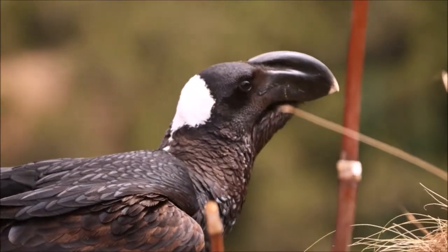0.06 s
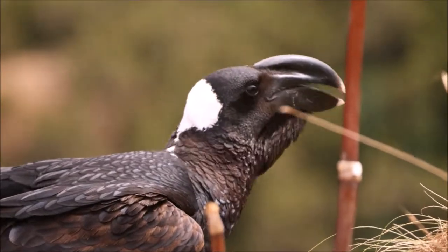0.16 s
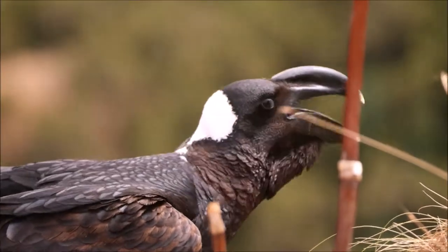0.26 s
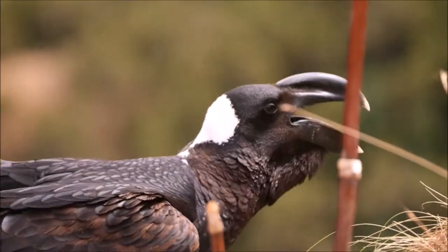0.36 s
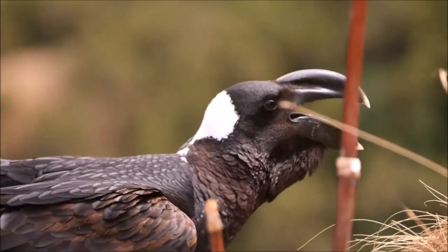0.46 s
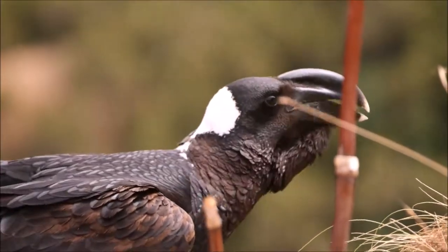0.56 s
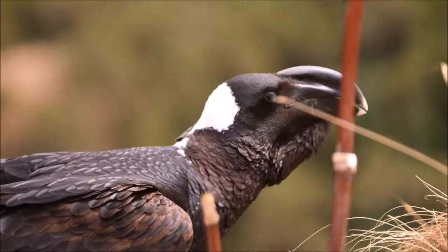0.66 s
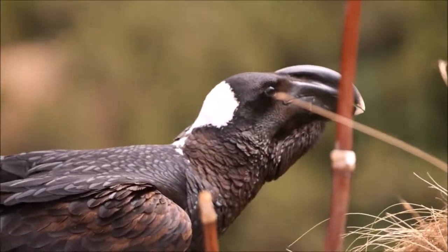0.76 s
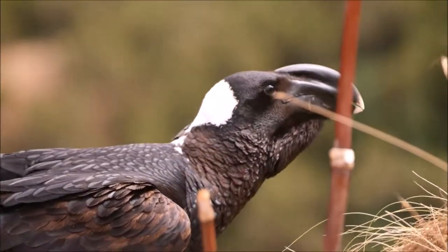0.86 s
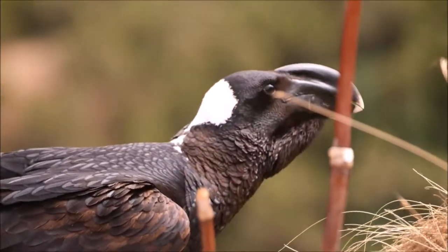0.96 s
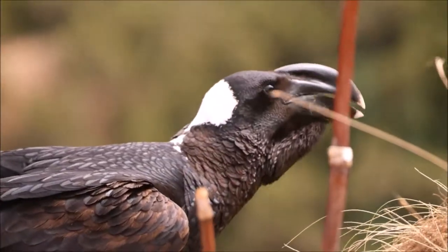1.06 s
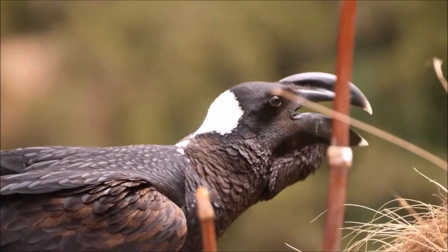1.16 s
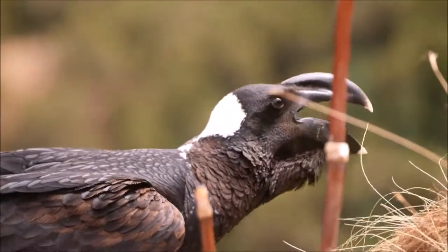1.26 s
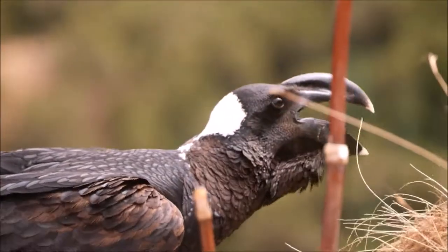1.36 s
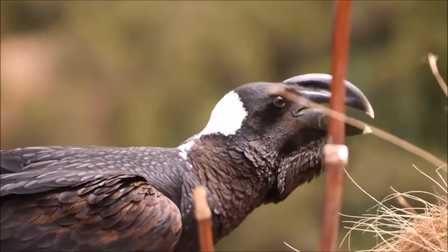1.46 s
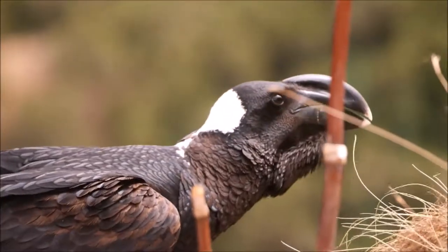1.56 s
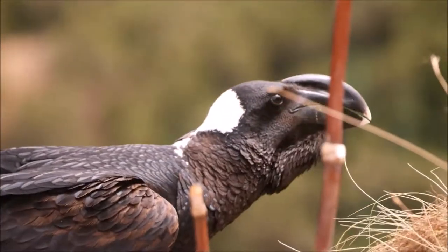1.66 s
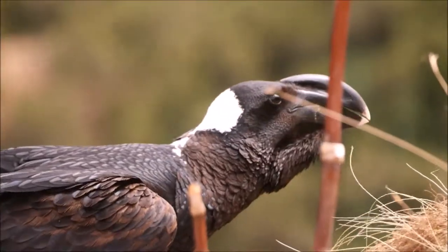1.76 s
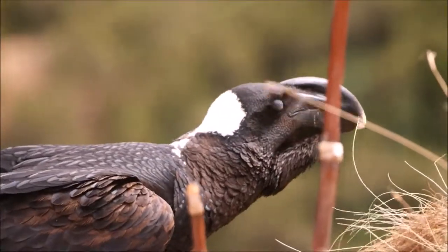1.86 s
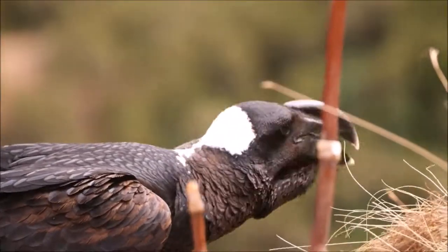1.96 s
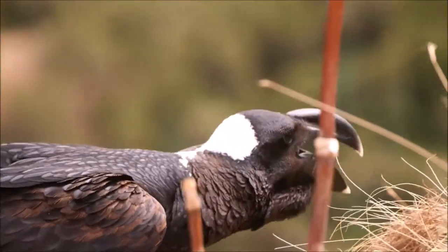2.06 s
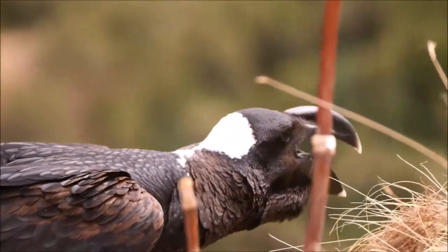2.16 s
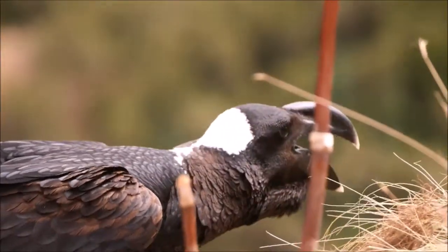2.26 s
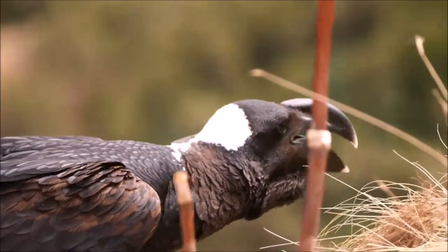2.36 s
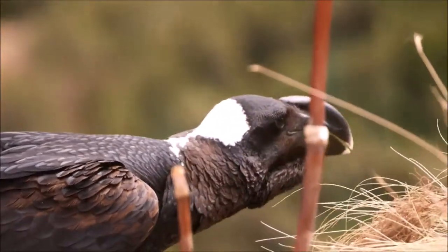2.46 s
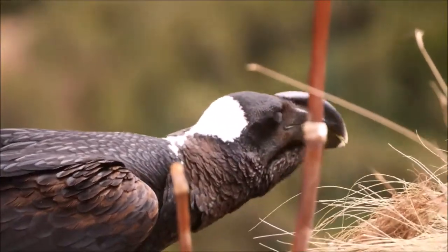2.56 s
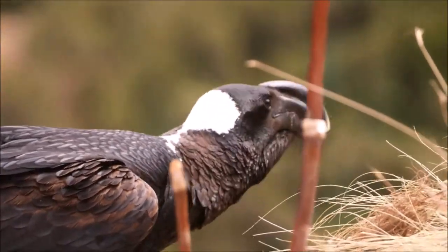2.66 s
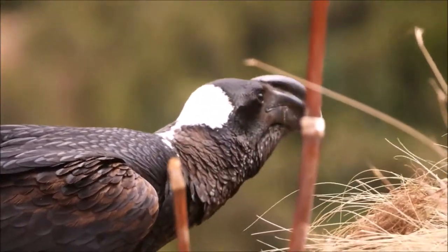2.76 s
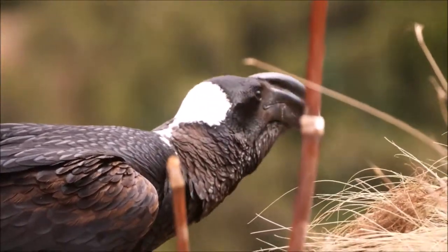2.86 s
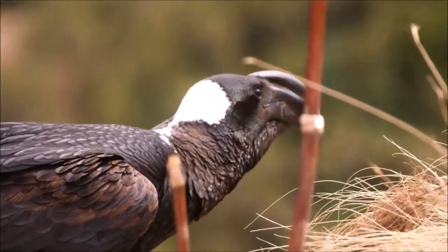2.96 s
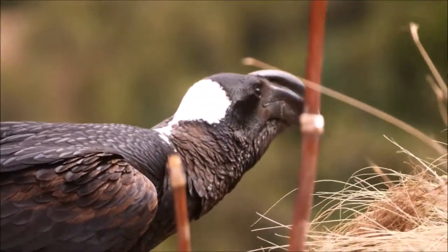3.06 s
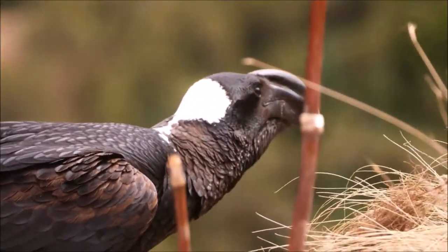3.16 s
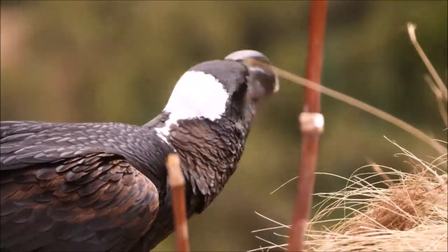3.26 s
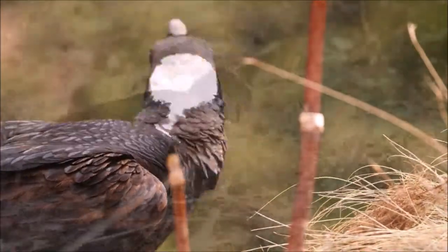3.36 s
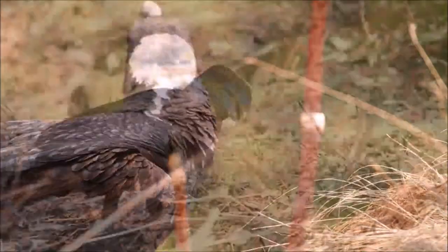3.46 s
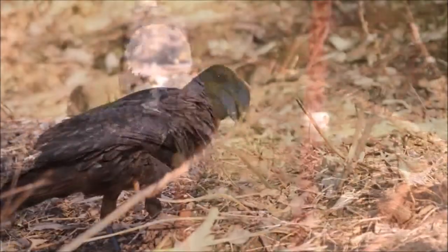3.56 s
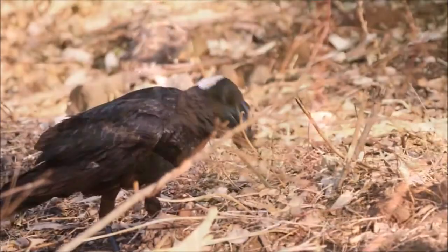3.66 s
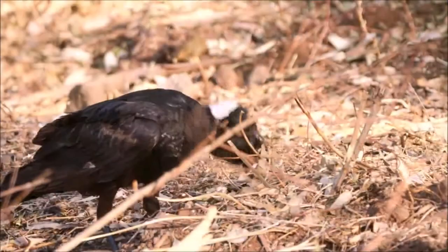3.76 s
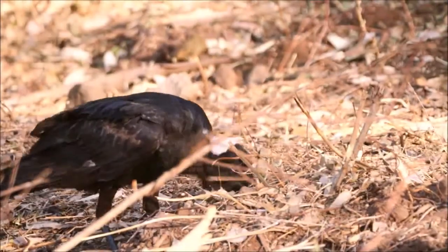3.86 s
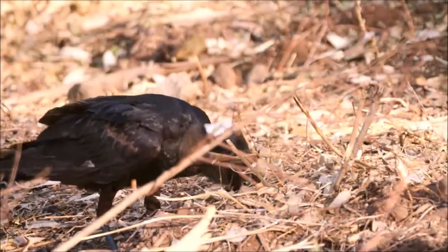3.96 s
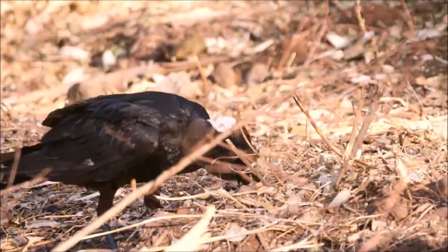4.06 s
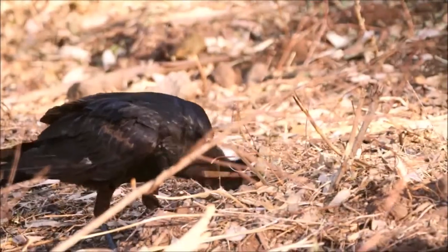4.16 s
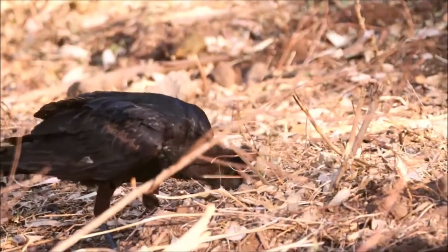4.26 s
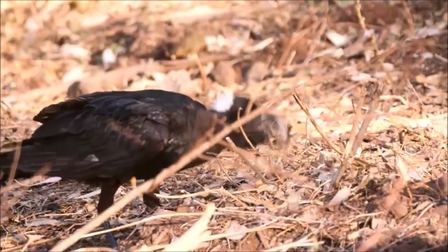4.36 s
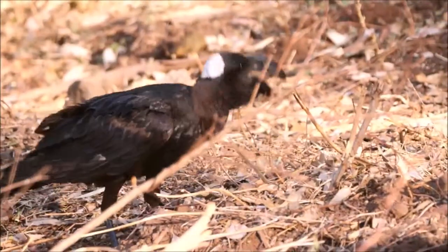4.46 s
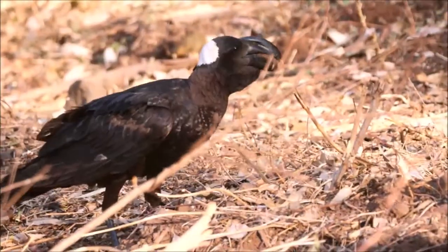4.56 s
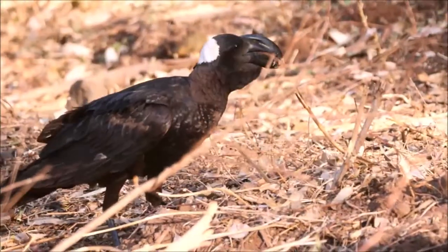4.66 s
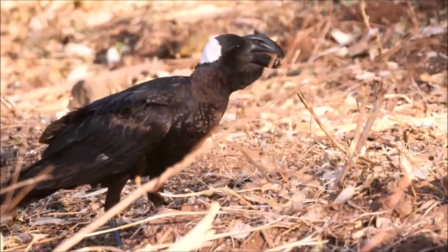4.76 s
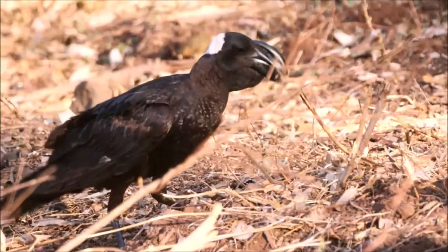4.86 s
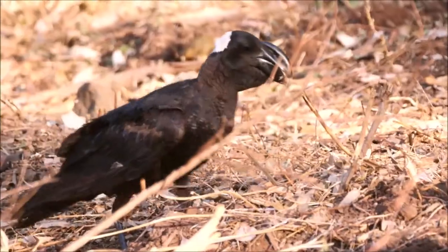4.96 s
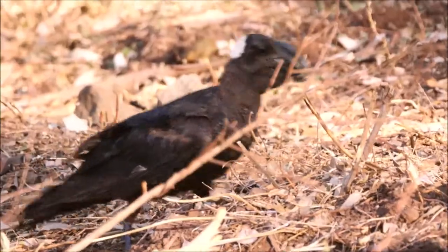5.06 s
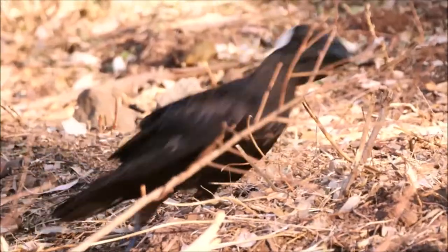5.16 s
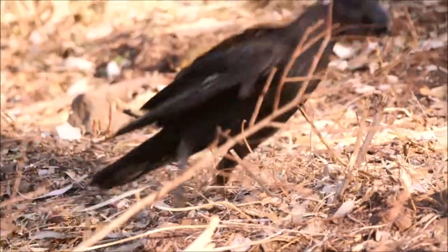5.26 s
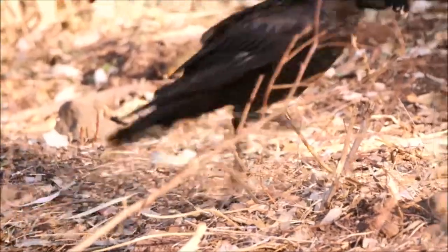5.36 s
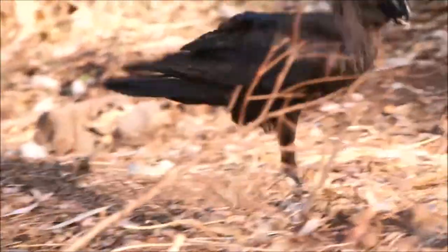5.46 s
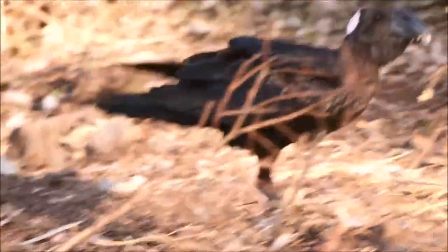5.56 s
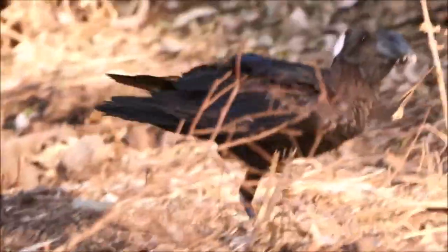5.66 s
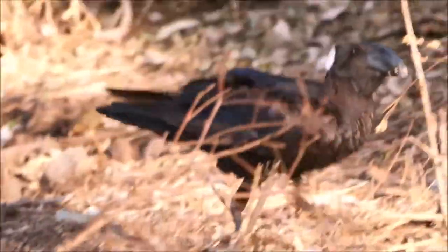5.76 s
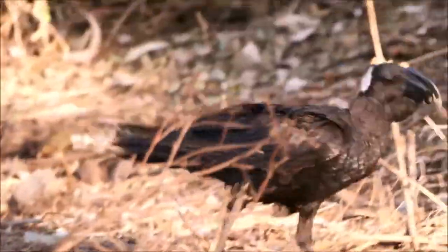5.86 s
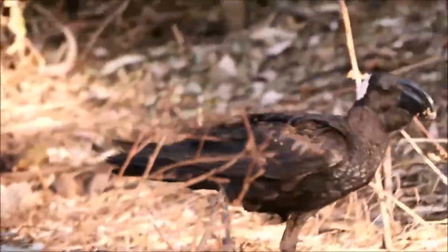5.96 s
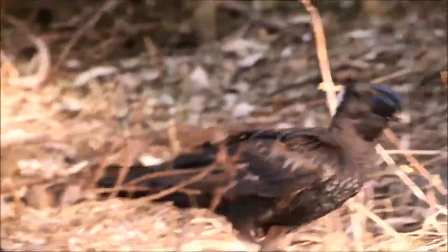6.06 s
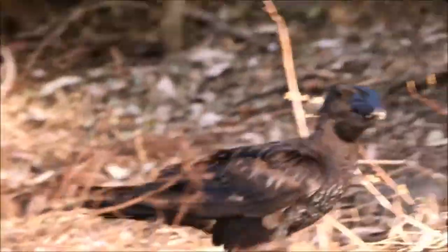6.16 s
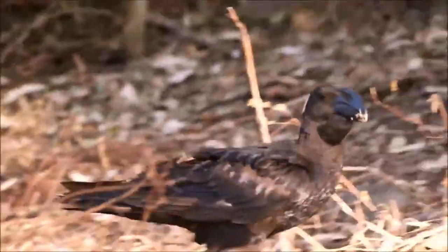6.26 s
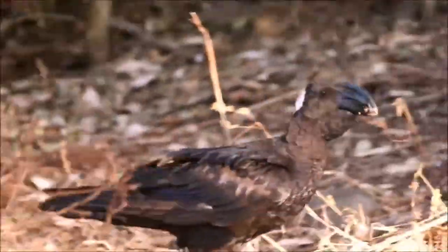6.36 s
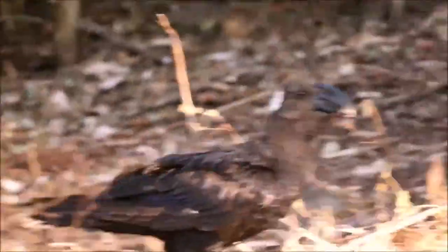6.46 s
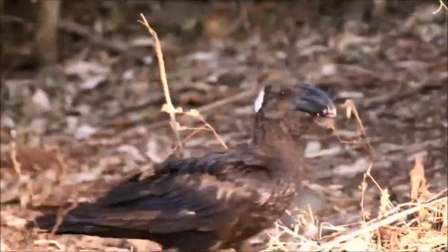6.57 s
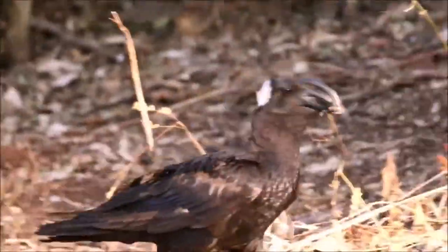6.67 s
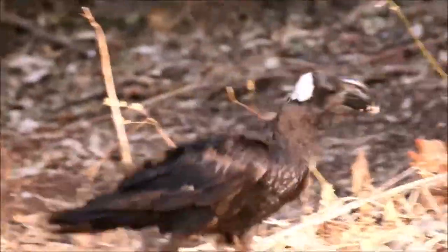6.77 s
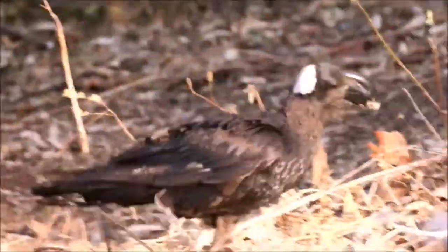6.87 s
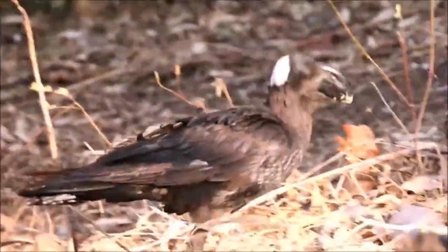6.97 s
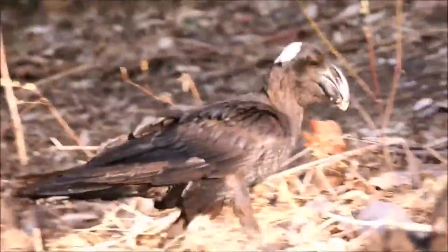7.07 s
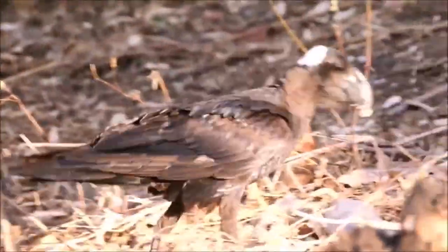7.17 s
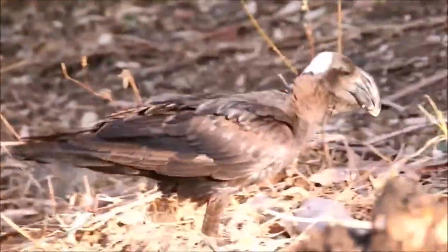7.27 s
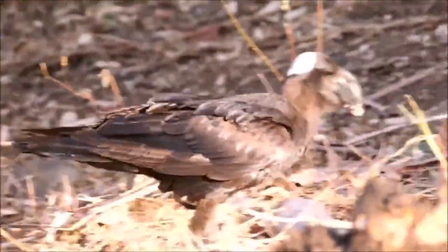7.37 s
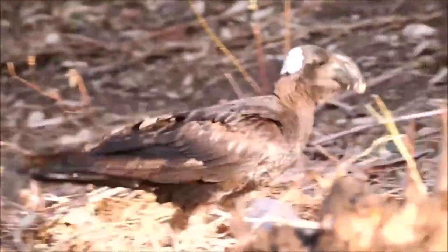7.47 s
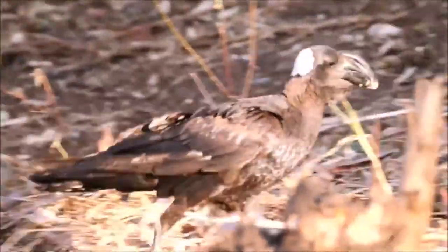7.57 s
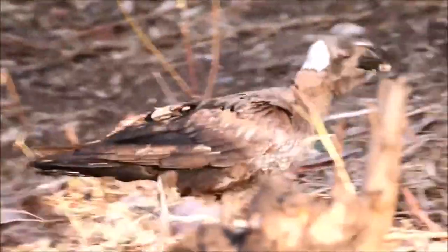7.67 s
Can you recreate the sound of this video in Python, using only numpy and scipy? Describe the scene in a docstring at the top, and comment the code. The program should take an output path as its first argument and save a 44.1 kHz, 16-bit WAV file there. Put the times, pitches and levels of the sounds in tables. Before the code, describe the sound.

Three close, throaty raven caws, each a shrill whistle chopped into a fast rough rattle with breath, come over gusty low wind buffeting. After the last caw there is a calm, then the background changes to a broader outdoor murmur. A distant raven gives a short pulsing croak and a few falling yelps; small birds add thin descending whistles and buzzy chirps, with crisp dry-litter ticks and a brief rustle.

```python
"""A large raven close by gives three rasping caws: whistles chopped by a slow throat cycle, knocks and breath.
Wind buffets the microphone with rumbling noise and short swings of pressure. The air of this first place,
shaped noise, fades out. A second place fades in: a broad outdoor murmur and hiss, a farther raven that croaks
in throat pulses and yelps in falling partials, small birds made of gliding tones in echoes, and dry stalks
that tick in short noise bursts."""
import sys
import numpy as np
from scipy import signal
from scipy.fft import rfft, irfft, next_fast_len
from scipy.io import wavfile
from scipy.ndimage import uniform_filter1d, map_coordinates

SR = 44100
rng = np.random.default_rng(int(sys.argv[2]) if len(sys.argv) > 2 else 0)


def waveform_to_disk(signal):
    """Save audio, clipped to [-1, 1], as 16-bit WAV at the path in sys.argv[1]."""
    frames = np.transpose(np.atleast_2d(signal))
    scaled = np.clip(frames, -1, 1) * 32767
    samples = np.round(scaled).astype(np.int16)
    wavfile.write(sys.argv[1], SR, samples)


N = 340893


def amp(db):
    """Turn decibels into a plain multiplier."""
    return 10 ** (np.asarray(db) / 20)


def unit(x):
    """Scale a sound to an rms of 1."""
    return x / np.sqrt(np.mean(x ** 2) + 1e-20)


def along(points, hz):
    """Read a curve of (Hz, value) points, with pitch on a log axis."""
    f, v = np.transpose(points)
    return np.interp(np.log(hz + 1), np.log(f + 1), v)


def span(rows):
    """Sample numbers from the first row to the last, and each column filled in between its rows."""
    times, *columns = np.transpose(rows)
    i = np.arange(round(times[0] * SR), min(round(times[-1] * SR), N))
    return i, [np.interp(i / SR, times, column) for column in columns]


def wobble(rate, size=N):
    """A smooth random curve with this many random points a second."""
    points = rng.standard_normal(int(size * rate / SR) + 4)
    return map_coordinates(points, [np.arange(size) * rate / SR])


def filtered(x, response):
    """Change the strength and timing of each frequency in x by a response curve."""
    m = next_fast_len(x.shape[-1] + 8192)
    spectrum = rfft(x, m) * response(np.fft.rfftfreq(m, 1 / SR))
    return irfft(spectrum, m)[..., :x.shape[-1]]


def tract(modes):
    """The response of a hollow tube: resonances (Hz, width Hz, dB) added with alternating sign."""
    def response(f):
        return sum((-1) ** k * amp(db) * 1j * f * width / (centre ** 2 - f * f + 1j * f * width)
                   for k, (centre, width, db) in enumerate(modes))
    return response


def pulses(rate, scatter_db):
    """One click of slightly random size per cycle, and the running cycle count."""
    count = np.cumsum(rate) / SR
    sizes = amp(scatter_db * rng.standard_normal(200))
    return np.diff(np.floor(count), prepend=0) * sizes[count.astype(int)], count


def rush(spectrum, alike, patchy_db):
    """Stereo noise of rms 1, made uneven by smooth random patches in time and pitch."""
    z = signal.stft(rng.standard_normal((2, N)), nperseg=512)[2]
    field = uniform_filter1d(rng.standard_normal(z.shape[1:]), size=6, axis=0)
    field = uniform_filter1d(field, size=12, axis=1)
    pair = signal.istft(z * amp(patchy_db * unit(field)), nperseg=512)[1][:, :N]

    def mix(hz):
        # this angle splits the noise into a shared part and a left-right difference
        angle = np.arccos(np.clip(along(alike, hz), -1, 1)) / 2
        return amp(along(spectrum, hz)) * [np.cos(angle), np.sin(angle)]

    mid, side = filtered(pair, mix)
    return unit(np.array([mid + side, mid - side]))


def echoes(x, t60, alike, colour):
    """A smeared tail from ground, trees and slopes that dies by 60 dB in t60 s, partly shared by both sides."""
    t = np.arange(SR // 2) / SR
    tail = rng.standard_normal((2, len(t))) * amp(-60 * t / t60) * (t > .004)
    tail = tail + alike * tail[::-1]
    tail = filtered(tail / np.linalg.norm(tail[0]), lambda hz: amp(along(colour, hz)))
    return signal.fftconvolve(x[None], tail, axes=1)[:, :N]


def swell(s, rise_s, fall_s):
    """A rise and fall in strength that peaks at 1 at time s."""
    t = np.arange(N) / SR - s
    return np.exp(np.minimum(t / rise_s, -t / fall_s))


# tone of the first place's air: pitch_hz, relative level_db per Hz
HILL_TONE = [(25, -43.5), (60, -17), (110, 2), (250, -7.5), (550, -11.5), (980, -11), (1150, -16),
             (1600, -20), (1820, -15.5), (2050, -23), (3200, -16.5), (3900, -26.5), (8300, -24.5),
             (9100, -39), (10500, -29), (15600, -22.5)]
# tone of the second place's murmur: pitch_hz, relative level_db per Hz
MURMUR_TONE = [(25, -32), (45, -27), (96, -3.5), (190, -0.5), (450, -5.5), (900, -8.5), (1250, -16.5),
               (1500, -16.5), (1680, -15.5), (2100, -22.5), (2600, -25), (3100, -20.5), (3500, -25),
               (4000, -37), (6000, -52)]
# tone of the second place's hiss: pitch_hz, relative level_db per Hz
HISS_TONE = [(2500, -20), (4000, -4), (6000, -5), (8300, -5), (8650, -22), (9050, -57), (9700, -8),
             (10400, -13.5), (12000, -6.5), (15600, -4)]
# how alike left and right are in the air, and in the rustle below: pitch_hz, likeness (-1 to 1)
SIDE_LIKENESS = [(60, 0.99), (180, 1.0), (550, 0.95), (1650, 0.57), (4970, 0.36), (15000, -0.21)]
HILL_DB, FADE_OUT_S, FADE_OUT_POWER = -54.5, 3.856, 0.99
CUT_S = 3.672  # the second place takes over
MURMUR_DB, HISS_DB, FADE_IN_FROM_S, FADE_IN_TO_S = -48, -63, 3.456, 5.55  # levels once faded in


def air():
    """Steady background noise: the first place fades out, the second cuts in and fades up."""
    t = np.arange(N) / SR
    leaving = np.clip(1 - t / FADE_OUT_S, 0, 1) ** FADE_OUT_POWER * (t < CUT_S)
    coming = np.clip((t - FADE_IN_FROM_S) / (FADE_IN_TO_S - FADE_IN_FROM_S), 0, 1) * (t >= CUT_S)
    hill = amp(HILL_DB) * rush(HILL_TONE, SIDE_LIKENESS, patchy_db=2.0)
    murmur = amp(MURMUR_DB + 1.24 * wobble(4.9)) * rush(MURMUR_TONE, SIDE_LIKENESS, patchy_db=1.5)
    hiss = amp(HISS_DB) * rush(HISS_TONE, SIDE_LIKENESS, patchy_db=1.6)
    return leaving * hill + coming * (murmur + hiss)


# strength of the wind's rumble before the low cut: time_s, level_db
WIND_STRENGTH = [(0, -64), (.17, -42.5), (.3, -33), (.39, -37.5), (.53, -31.5), (.64, -43.5), (.72, -36.5),
                 (.79, -28), (.83, -39.5), (1.02, -41.5), (1.18, -47.5), (1.28, -41.5), (1.36, -46.5),
                 (1.65, -48), (1.72, -66), (2.05, -70), (2.15, -53.5), (2.55, -53.5), (2.6, -73),
                 (3.1, -80.5)]
# single shoves of wind before the low cut: time_s, peak_db, swing_hz at the peak
SHOVES = [(0.085, -27.5, 222), (0.135, -28, 227), (0.231, -26.5, 285), (0.293, -17, 283),
          (0.35, -15.5, 270), (0.407, -13, 440), (0.422, -18, 340), (0.434, -21, 348), (0.514, -17, 317),
          (.527, -24, 360), (.552, -16.5, 317), (0.589, -19, 480), (0.707, -18.5, 356), (.736, -14.5, 437),
          (0.845, -20.5, 270), (0.86, -29.5, 347), (0.915, -17, 244), (1.208, -28.5, 247),
          (1.613, -27, 204), (1.665, -38.5, 230), (2.114, -40.5, 196), (2.532, -33, 292), (2.615, -44, 217),
          (2.691, -41.5, 243), (2.826, -39.5, 197), (2.907, -30, 245), (2.926, -49.5, 248),
          (2.944, -34.5, 197), (2.987, -53, 179.6)]
# tone of the rumble before the low cut: pitch_hz, relative level_db per Hz
RUMBLE_TONE = [(25, -42.5), (50, -32.5), (80, -16), (120, -2), (180, 2), (270, -2.5), (450, -14),
               (800, -32.5), (1300, -44), (2500, -82)]
WAKE_DB, WAKE_RISE_S, WAKE_FALL_S = -21, .01, .02  # the rumble swells around each shove, relative to it


def wind():
    """Eddies push on the microphone: a lumpy rumble and single short swings, both thinned by a low cut."""
    out, t = np.zeros((2, N)), np.arange(-300, 1500) / SR
    i, (level_db,) = span(WIND_STRENGTH)
    wake = np.max([amp(peak_db + WAKE_DB) * swell(s, WAKE_RISE_S, WAKE_FALL_S)
                   for s, peak_db, _ in SHOVES], axis=0)
    lumps = amp(5.2 * np.tanh(wobble(45)) + 1.1 * wobble(11))
    rumble = unit(lumps * rush(RUMBLE_TONE, [(30, .7), (100, 0.93)], patchy_db=3.5))
    out[:, i] = (amp(level_db) + wake[i]) * rumble[:, i]
    for s, peak_db, hz in SHOVES:
        push = np.where(t < 0, np.exp(-(t * hz / 0.33) ** 2), np.exp(-t * hz / .9))
        swing = np.cos(2 * np.pi * hz * t / (1 + 60 * np.abs(t)))  # slows away from its peak
        out[:, round(s * SR) - 300:][:, :len(t)] -= amp(peak_db) * push * swing
    return filtered(out, lambda f: (1j * f / (75 + 1j * f)) ** 2)  # low cut near 75 Hz


# snapping dry stalks: time_s, strength_db before the resonance, centre_hz
STALK_SNAPS = [(.16, -30.5, 2440), (.234, -50.5, 6500), (.761, -49.5, 5050), (.829, -41.5, 2370),
               (.88, -50.5, 7430), (.94, -54, 7300), (1.024, -55, 7060), (3.656, -56, 6000),
               (3.677, -55.5, 5550), (4.329, -60, 6920), (4.586, -55, 7900), (4.625, -58.5, 7000),
               (5.49, -50, 8700), (5.522, -49, 7400), (6.154, -34, 850), (6.411, -47, 6900),
               (6.487, -45.5, 7600), (6.597, -46, 8600), (6.916, -46, 8050), (7.179, -55.5, 7200),
               (7.258, -43.5, 4130)]
# tone of the rustling litter: pitch_hz, relative level_db per Hz
RUSTLE_TONE = [(1000, -17), (2500, 5.5), (4300, -5), (8000, -0.5), (9000, -14), (10000, -6), (15600, -12)]
TICK_CYCLES, TICK_LONGEST_S = 130, 0.037  # time to die by 60 dB: this many cycles, at most this long
RUSTLE_S, RUSTLE_DB, RUSTLE_RISE_S, RUSTLE_FALL_S = 5.64, -55.5, .05, .12


def ticks():
    """Dry stalks snap in short broad bursts, the high ones shortest; dry litter stirs once under a hop."""
    out, t = np.zeros((2, N)), np.arange(SR // 6) / SR
    for s, db, hz in STALK_SNAPS:
        burst = rng.standard_normal((2, len(t)))
        burst = burst + burst[::-1] * .5  # partly shared by both sides
        burst = burst * amp(-60 * t / min(TICK_CYCLES / hz, TICK_LONGEST_S))
        out[:, round(s * SR):][:, :len(t)] += amp(db) * filtered(burst, tract([(hz, 0.21 * hz, 0)]))
    stir = amp(RUSTLE_DB) * swell(RUSTLE_S, RUSTLE_RISE_S, RUSTLE_FALL_S)
    return out + stir * rush(RUSTLE_TONE, SIDE_LIKENESS, patchy_db=4)


def chirp(length, glide, depth_hz, shake_hz, peak):
    """One bird note whose pitch follows glide(t) and shakes fast; loudest near the share peak of its length."""
    t = np.arange(int(length * SR)) / SR
    u = t / length
    hz = glide(t) + depth_hz * (np.sin(2 * np.pi * shake_hz * t) + 0.5 * wobble(300.3, size=len(t)))
    shape = np.minimum(0.22 + 0.88 * (u / peak) ** 1.74, (1 - u) / (1.02 - peak) + 0.14)
    shape = shape * np.clip((1 - u) / 0.029, 0, 1)
    return amp(3.7 * wobble(48.0, size=len(t))) * shape * np.sin(2 * np.pi * np.cumsum(hz) / SR)


# falling whistles, before the pitch shake and echoes: start_s, length_s, start_hz, end_hz, strength_db
BIRD_WHISTLES = [(5.066, 0.23, 5320, 2950, -59), (6.139, 0.19, 4140, 2880, -63.5),
                 (6.623, 0.048, 3940, 3130, -70), (6.955, 0.22, 5070, 3035, -56)]
# buzzy notes and one nearly steady held note, before echoes:
# start_s, length_s, settled_hz, strength_db, shake_depth_hz
SHAKEN_NOTES = [(3.668, 0.13, 5710, -83.5, 110), (3.788, 0.13, 5110, -69.5, 310),
                (5.122, 0.11, 5690, -61.5, 263), (5.902, 0.15, 5730, -56, 236),
                (6.322, .21, 4780, -70.5, 40), (7.425, 0.13, 5700, -54.5, 199)]
QUIVER_HZ, QUIVER_RATE_HZ, WHISTLE_PEAK = 40.2, 68, 1
# a shaken note slides up into its pitch from SCOOP depths below
SHAKE_RATE_HZ, SHAKEN_PEAK, SCOOP, SCOOP_S = 370, 0.27, 5.2, .012


def birds():
    """Small birds: tones that glide down, buzzy tones with a fast pitch shake, one nearly steady held note."""
    out = np.zeros(N)
    for s, length, start_hz, end_hz, db in BIRD_WHISTLES:
        fall = lambda t: start_hz + (end_hz - start_hz) * t / length
        note = chirp(length, fall, QUIVER_HZ, QUIVER_RATE_HZ, WHISTLE_PEAK)
        out[round(s * SR):][:len(note)] += amp(db) * note
    for s, length, hz, db, depth_hz in SHAKEN_NOTES:
        scoop = lambda t: hz - SCOOP * depth_hz * np.exp(-t / SCOOP_S)
        note = chirp(length, scoop, depth_hz, SHAKE_RATE_HZ, SHAKEN_PEAK)
        out[round(s * SR):][:len(note)] += amp(db) * note
    return out


# the far raven's throat resonances, before sharpening: centre_hz, width_hz, relative level_db
FAR_THROAT_MODES = [(658, 200, 3), (1053, 220, 1.5), (1636, 240, -4)]
CROAK_S, CROAK_LENGTH_S = 5.0966, .4
CROAK_RATE, ONSET_RATE, SETTLE_S = 96.56, 29.43, .0987  # pulses per s: steady, extra at onset; its decay
TIRE_S, TIRE_RATE_PER_S = .2483, 341.1  # then the rate slumps, in pulses per s each second
CROAK_DB, CROAK_ATTACK_S, CROAK_SWELL_DB = -48, 0.041, 4.5


def croak():
    """Slowing single throat pulses, each ringing the throat's resonances."""
    t = np.arange(int(CROAK_LENGTH_S * SR)) / SR
    rate = CROAK_RATE + ONSET_RATE * np.exp(-t / SETTLE_S) - TIRE_RATE_PER_S * np.clip(t - TIRE_S, 0, 1)
    beats = pulses(rate, scatter_db=1)[0]
    level = amp(CROAK_DB + CROAK_SWELL_DB * t / CROAK_LENGTH_S) * np.clip(t / CROAK_ATTACK_S, 0, 1)
    return level * unit(filtered(beats, lambda f: tract(FAR_THROAT_MODES)(f) ** 2))


# yelps before pitch and level shake: start_s, length_s, start_hz, end_hz, strength_db, power of the fall
FAR_YELPS = [(5.497, 0.18, 653, 344, -35.5, 1.99), (6.271, .14, 729, 476, -42.5, 4.2),
             (6.529, .065, 595, 484, -48.5, 1.21)]
YELP_ONSET, YELP_ATTACK, YELP_RELEASE = 0.27, 0.76, .3  # strength at the start; shares of the yelp
FIRST_DB, YELP_THROAT = -7, 1.35  # first partial against the second; sharpness of the throat


def far_raven():
    """A croak, then hoarse falling yelps whose two partials cross the throat's resonances."""
    out = np.zeros(N)
    rasp = croak()
    out[round(CROAK_S * SR):][:len(rasp)] = rasp
    for s, length, start_hz, end_hz, db, sag in FAR_YELPS:
        u = np.linspace(0, 1, int(length * SR))
        hz = start_hz + (end_hz - start_hz) * u ** sag
        turn = 2 * np.pi * np.cumsum(hz * (1 + 0.037 * wobble(119.2, size=len(u)))) / SR
        shake = amp(3.45 * wobble(87.4, size=len(u)))
        voice = 0
        for k, part_db in enumerate((FIRST_DB, 0), 1):
            throat = np.abs(tract(FAR_THROAT_MODES)(k * hz)) ** YELP_THROAT
            voice = voice + amp(part_db) * throat * np.sin(k * turn)
        rise = YELP_ONSET + (1 - YELP_ONSET) * u / YELP_ATTACK
        shape = np.clip(np.minimum(rise, (1 - u) / YELP_RELEASE), 0, 1)
        out[round(s * SR):][:len(u)] += np.sqrt(2) * amp(db) * shape * shake * voice
    return out


# tone of the breath: pitch_hz, relative level_db per Hz
BREATH_TONE = [(300, -35), (1000, -19.5), (1500, -18), (2150, -12), (2900, 3), (4050, -7.5), (5500, -4.5),
               (6400, -5), (7000, -19), (7800, -12.5), (8400, -23.5), (9100, -39), (10500, -31.5),
               (13000, -28.5), (15800, -39)]


def breath_noise(held):
    """Rushing breath, with turbulence strongest while the throat's gap is open."""
    noise = filtered(rng.standard_normal(len(held)), lambda f: amp(along(BREATH_TONE, f)))
    return unit(noise * (1.0 + held))


def closing_knock(slam, count, rough, modes):
    """The throat slams shut and rings; a rough knock rattles on as it dies away, its low tones coming last."""
    rattle = 0.14 * rough * np.exp(-(count % 1) / 0.48) * rng.standard_normal(len(count))

    def ring(f):
        slide = np.exp(-2j * np.pi * .005 * rough * (f - f * f / 6000))  # delays the low tones
        return tract(modes)(f) * slide / (1 + 1j * f / 2200) ** 3

    return unit(filtered(slam + rattle, ring))


# windpipe and beak acting on the upper whistle: pitch_hz, gain_db
BEAK_TONE = [(2150, -12), (2600, 1.5), (3300, 2), (4050, -29), (4400, -6), (4650, -8), (4950, -0.5),
             (5200, -8), (5550, 4), (5950, -6), (6300, 1.5), (7000, -21.5), (7700, -11)]


def upper_whistle(held, drop, turn, flutter, rough):
    """The whistle's high swoop, broken up when rough, and the octave over its held note, through the beak."""
    n = len(held)
    swoop = held * np.clip(3 * drop, 0, 1) * np.sin(turn) * flutter * amp(8 * rough * wobble(420, size=n))
    octave = held * (1 - drop) ** 4 * amp(5 * np.tanh(wobble(500, size=n)))
    octave = octave * np.sin(2 * turn + 1.0 * wobble(700, size=n))
    return unit(filtered(swoop + .4 * octave, lambda f: amp(along(BEAK_TONE, f))))


# throat cycle of each caw: start_s, length_s, cycles per s at the start, at the turn and at the end,
# share of the caw before the turn, roughness (0-1), open share of a cycle,
# shares of the open part spent dropping and fading
THROAT_CYCLES = [(.3618, .3379, 63.28, 60.34, 48.86, .2377, .5, .54, .5, .25),
                 (1.3015, .3075, 58.24, 46.45, 55.01, .529, .3, .62, .5, .2),
                 (2.1547, .363, 62.93, 47.48, 59.34, .59, .17, .62, .46, .12)]
# effort through each caw: time_s, held note_hz before its bends, whistle level_db before the edge fades
CAW_EFFORT = [
    [(.362, 2807, -79.5), (.392, 2950, -44), (.44, 2950, -36), (.49, 3070, -30), (.55, 3170, -35),
     (.61, 2960, -33.5), (.66, 2765, -39), (.7, 2680, -57)],
    [(1.3, 2914, -69), (1.33, 2930, -39), (1.37, 2658, -31.5), (1.42, 2712, -29.5), (1.49, 2470, -29.5),
     (1.54, 2640, -34), (1.585, 2696, -39.5), (1.612, 2680, -48)],
    [(2.155, 2845, -83), (2.185, 2886, -51.5), (2.22, 2594, -37), (2.28, 3092, -35.5), (2.4, 2698, -36.5),
     (2.45, 2587, -37), (2.49, 2690, -42), (2.52, 2756, -62)],
]
# other layers of each caw at full effort, halfway: upper whistle level_db, its gain_db over the caw,
# knock level_db, its gain_db, breath level_db, its gain_db
CAW_LAYERS = [(-35.5, 13, -36, 9.5, -33, 3), (-37.5, 4.5, -40.5, 0.5, -37.5, 1),
              (-42, 4.5, -41.5, -5, -44, -2)]
# throat resonances after a closure, per caw: centre_hz, width_hz, relative level_db
KNOCK_MODES = [
    [(444.4, 230, -9), (886, 63, 2.5), (1130, 290, -3), (1905, 130, -1)],
    [(427, 430, -7), (874, 130, 1.5), (1240, 180, -3.5), (1950, 180, -4)],
    [(426, 390, -10), (876, 130, -0.5), (1094, 80, 2), (1950, 100, -13)],
]
# a tone at half the held note, per caw, before its wobble: level_db against the whistle at full effort
HALF_TONE_DB = [-25.5, -17, -31.5]
LAYER_GROWTH = 1.5, 0.48, 1.01  # upper whistle, knock, breath: dB for each dB of effort
CYCLE_BEND = 1.6  # the cycle rate eases into and out of its turn by this power
CYCLE_SCATTER_DB = 3  # strength of one cycle against the next, at full roughness
WEAK_SAG = .012  # share by which the held note sinks further for each dB under full effort (up to 15)


def caws():
    """Each throat cycle opens on a whistle that drops from high up to a held note, then slams shut."""
    out = np.zeros(N)
    for cycle, rows, layers, modes, half_db in zip(THROAT_CYCLES, CAW_EFFORT, CAW_LAYERS, KNOCK_MODES,
                                                   HALF_TONE_DB):
        s, length, first, turning, last, turn_at, rough, opened, fall, fade = cycle
        i = np.arange(round(s * SR), round((s + length) * SR))
        n, gone = len(i), np.linspace(0, 1, len(i))
        times, note_hz, note_db = np.transpose(rows)
        note_hz, note_db = np.interp(i / SR, times, note_hz), np.interp(i / SR, times, note_db)
        effort_db = note_db - note_db.max()
        upper_db, knock_db, breath_db = (
            db + gain_db * (gone - .5) + grows * effort_db
            for (db, gain_db), grows in zip(np.reshape(layers, (-1, 2)), LAYER_GROWTH))

        away = np.where(gone < turn_at, 1 - gone / turn_at, (gone - turn_at) / (1 - turn_at)) ** CYCLE_BEND
        rate = turning + (np.where(gone < turn_at, first, last) - turning) * away
        slam, count = pulses(rate, scatter_db=1)
        u = np.clip((count % 1 - 1 + opened) / opened, 0, 1)  # 0 to 1 through the open part of the cycle

        # the membrane slackens as the gap widens; more effort starts the whistle higher
        drop = np.clip(1 - u / fall, 0, 1) ** 1.25
        reach_hz = 4000 * np.clip((upper_db + 64) / 16, .25, 1)
        sink = (0.095 - WEAK_SAG * np.clip(effort_db, -15, 0)) * (.5 - u)
        hz = note_hz * (1 + sink + 0.04 * rough * wobble(300, size=n)) + reach_hz * drop
        turn = 2 * np.pi * np.cumsum(hz) / SR
        flutter = amp(9 * rough * np.tanh(wobble(350, size=n)))

        held = np.clip(u / 0.096, 0, 1) * np.clip((1 - u) / fade, 0, 1)
        cycle_sizes = amp(CYCLE_SCATTER_DB * rough * rng.standard_normal(SR // 1000))
        held = held * cycle_sizes[count.astype(int)] * (count > 1)  # a caw starts on a knock
        half_tone = amp(half_db + effort_db + 5 * wobble(250, size=n)) * np.sin(turn / 2)
        note = unit(held * (1 - drop) ** 4 * flutter * (np.sin(turn) + half_tone))

        voice = amp(note_db) * note
        voice = voice + amp(upper_db) * upper_whistle(held, drop, turn, flutter, rough)
        voice = voice + amp(knock_db) * closing_knock(slam, count, rough, modes)
        voice = voice + amp(breath_db) * breath_noise(held)
        edge = np.clip(np.minimum(i - i[0], i[-1] - i) / (0.011 * SR), 0, 1)  # 11 ms fade at each end
        out[i] += edge * voice
    return out


def scene():
    """Near raven almost dry and central, far raven to the left, birds in long echoes."""
    near, far, small = caws(), far_raven(), birds()

    def colour(hz):  # left and right differ a little in tone
        return amp(np.array([[1], [-1]]) * along([(1000, 0.5), (2800, -.3), (5500, .7)], hz))

    near_tail = echoes(near, t60=0.059, alike=0,
                       colour=[(1000, -9), (3000, -13.5), (4500, -9.5), (8000, -2)])
    near = filtered(np.array([near, near]), colour) + near_tail
    far_tail = echoes(far, t60=0.71, alike=0.58, colour=[(500, -2.5), (1700, -1.0)])
    far = far * amp([[2.5], [-2.5]]) + far_tail * amp([[1.5], [-1.5]])  # left and right gains in dB
    small = small + echoes(small, t60=0.93, alike=0.07, colour=[(3300, 4.0), (6000, 3.9)])
    return near + far + small + ticks() + wind() + air() * amp([[.6], [-.6]])


TOP_HZ = 15760


def record(dry):
    """Keep only the frequencies below the upper limit."""
    return filtered(dry, lambda hz: hz < TOP_HZ)


dry = scene()
out = record(dry)
waveform_to_disk(out)
```